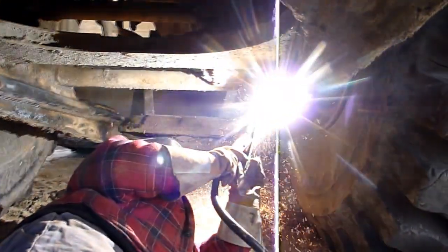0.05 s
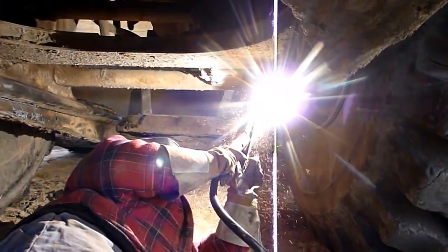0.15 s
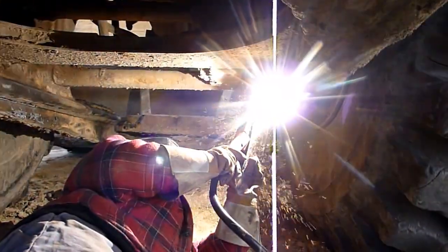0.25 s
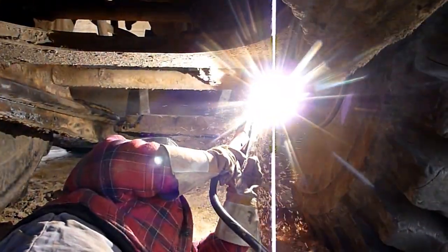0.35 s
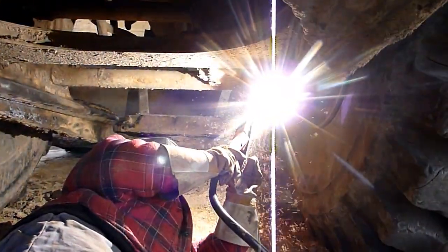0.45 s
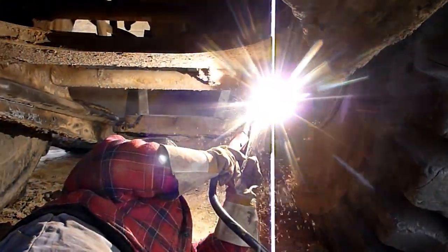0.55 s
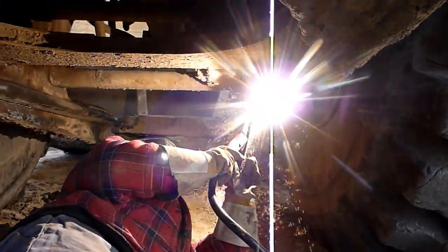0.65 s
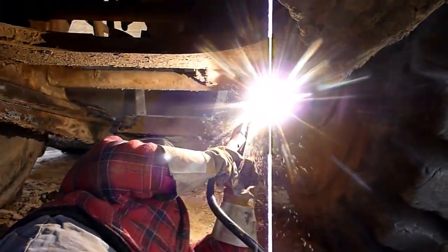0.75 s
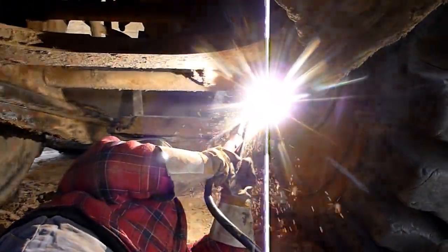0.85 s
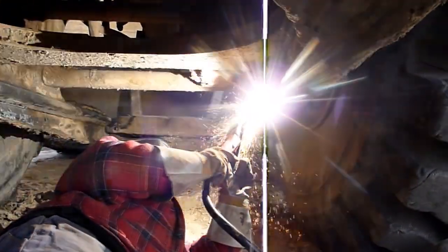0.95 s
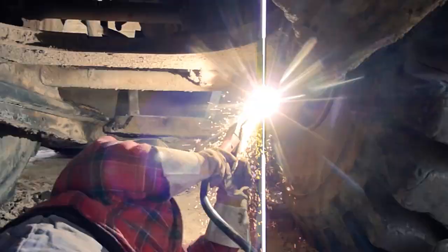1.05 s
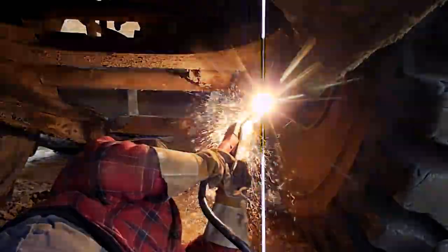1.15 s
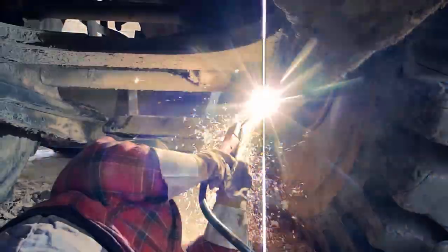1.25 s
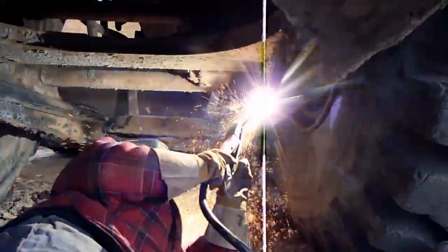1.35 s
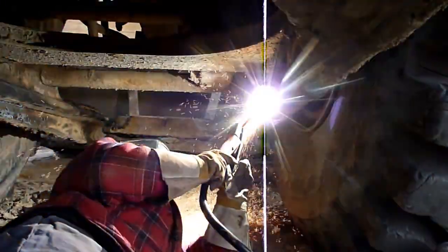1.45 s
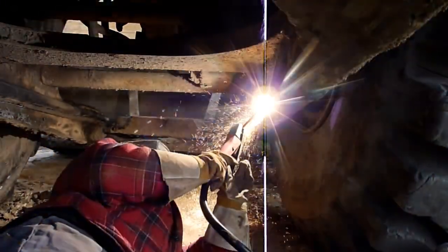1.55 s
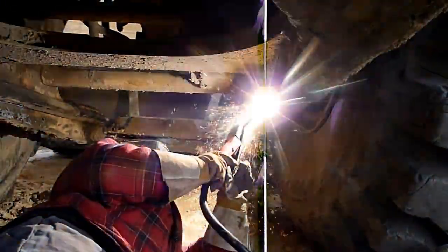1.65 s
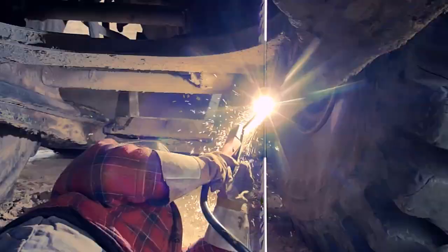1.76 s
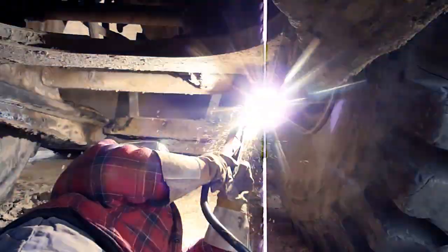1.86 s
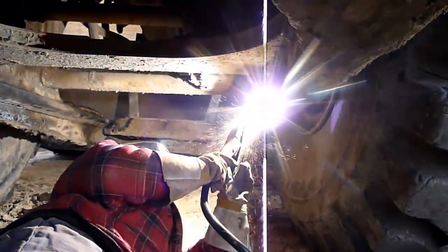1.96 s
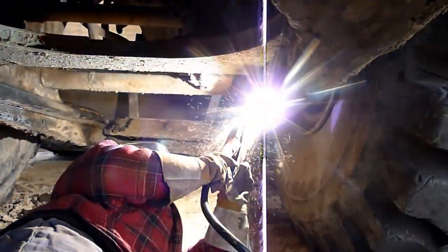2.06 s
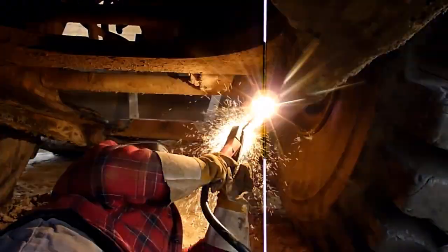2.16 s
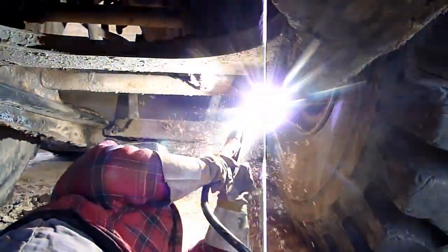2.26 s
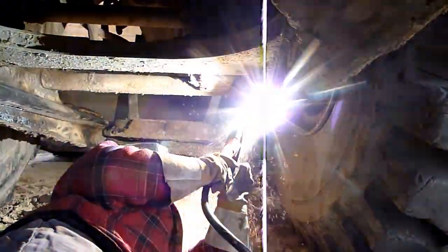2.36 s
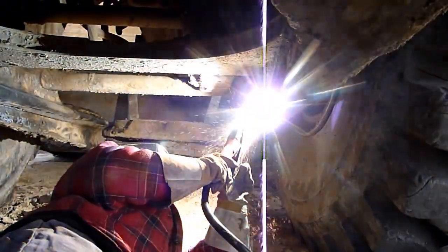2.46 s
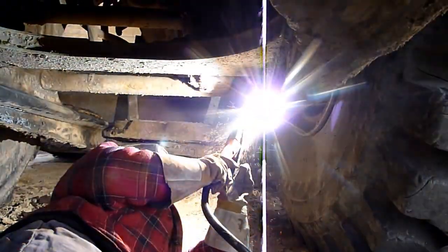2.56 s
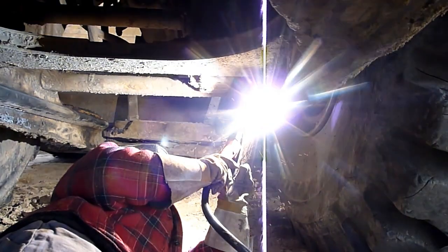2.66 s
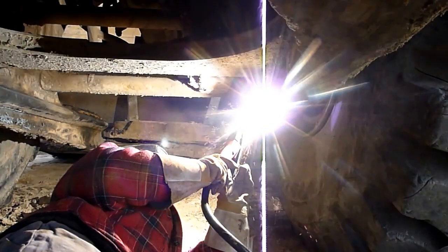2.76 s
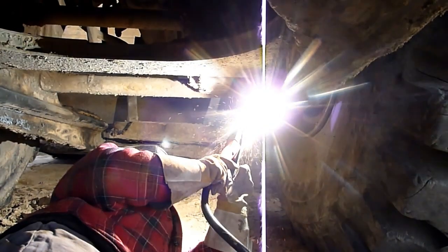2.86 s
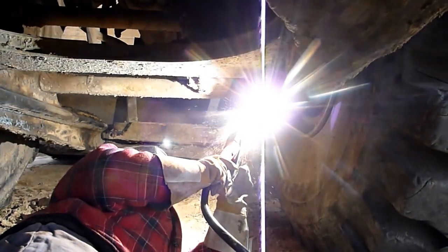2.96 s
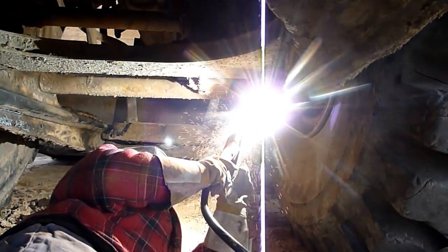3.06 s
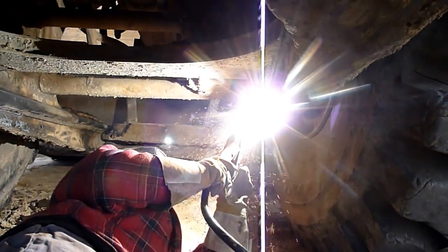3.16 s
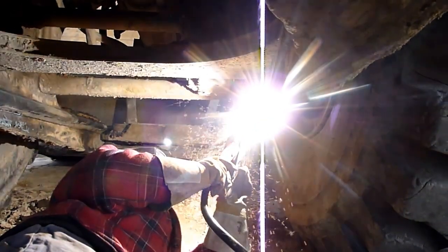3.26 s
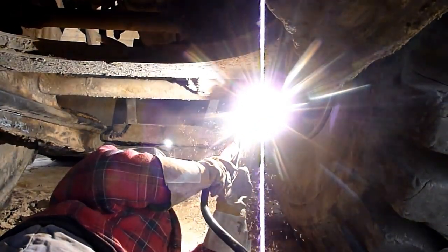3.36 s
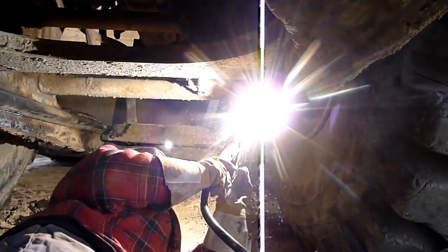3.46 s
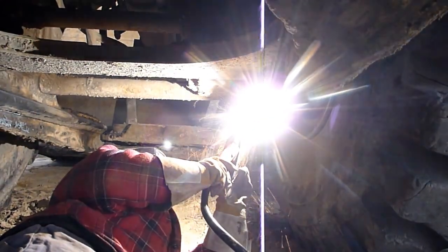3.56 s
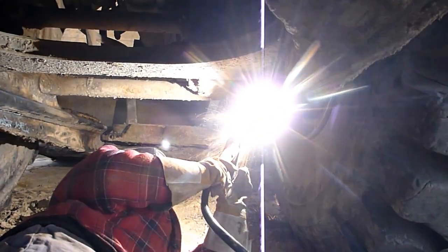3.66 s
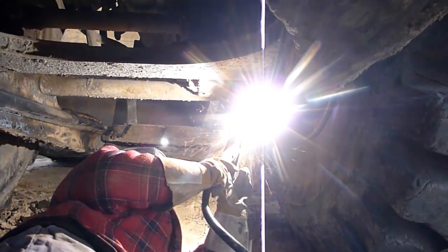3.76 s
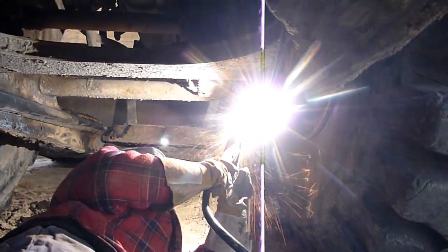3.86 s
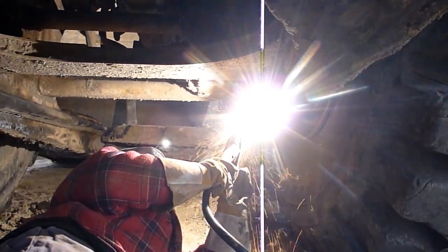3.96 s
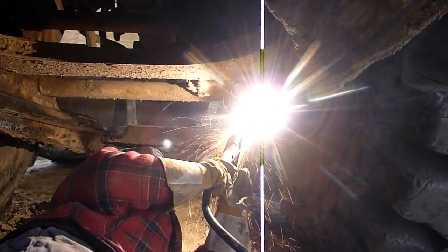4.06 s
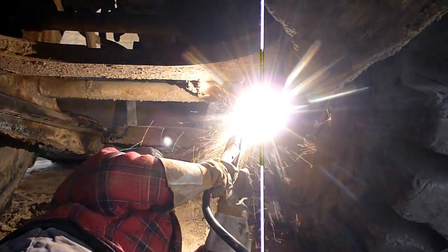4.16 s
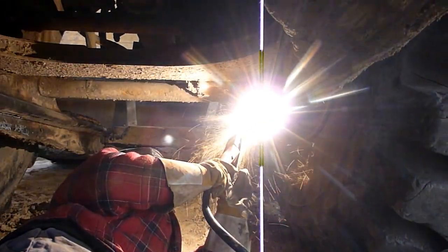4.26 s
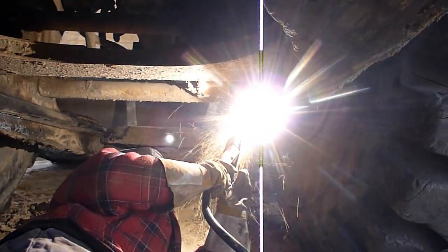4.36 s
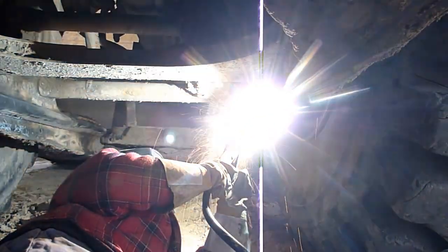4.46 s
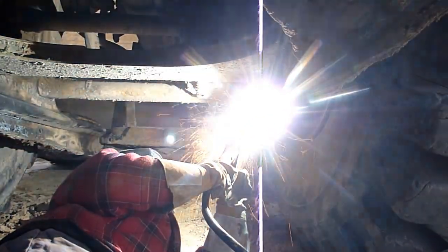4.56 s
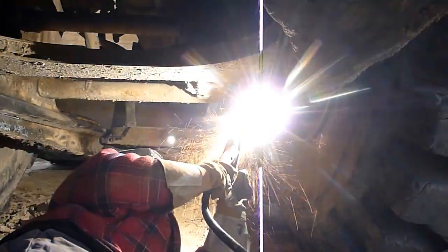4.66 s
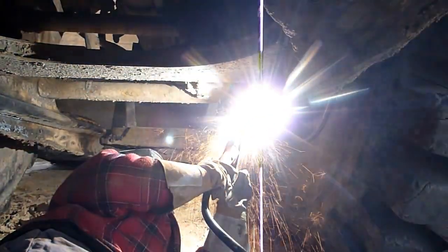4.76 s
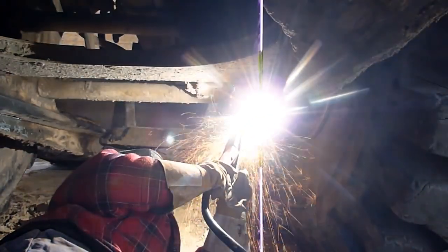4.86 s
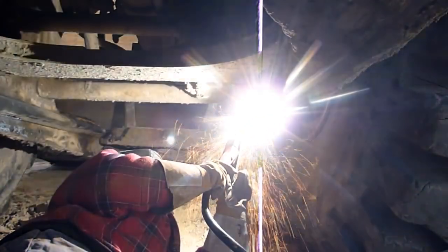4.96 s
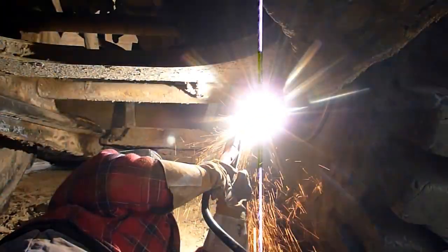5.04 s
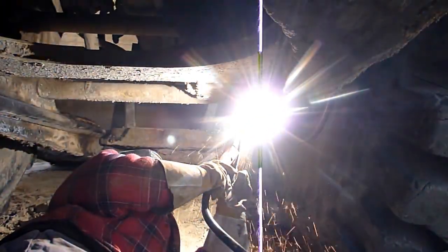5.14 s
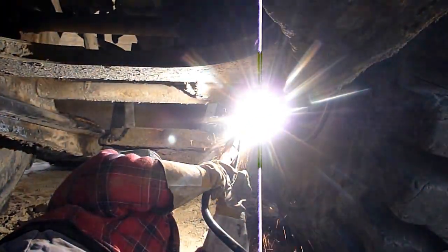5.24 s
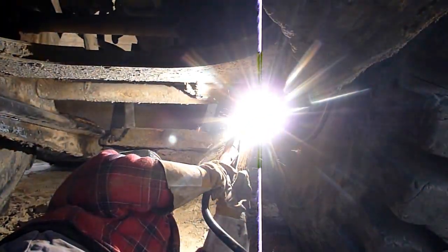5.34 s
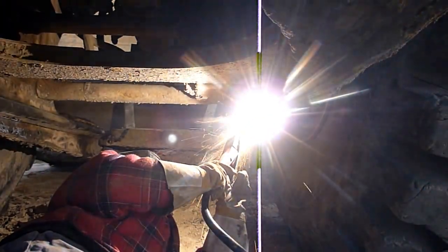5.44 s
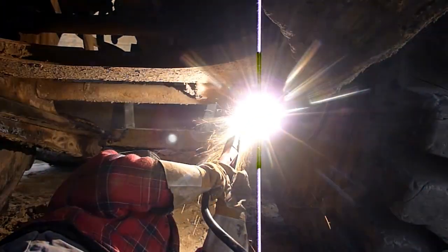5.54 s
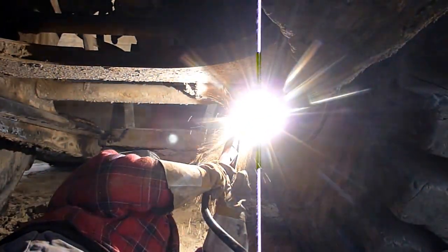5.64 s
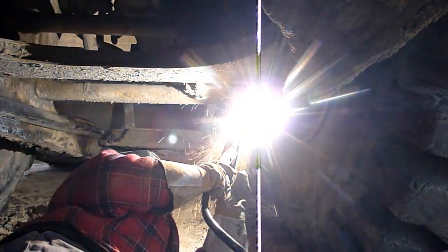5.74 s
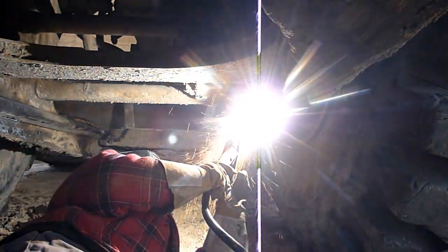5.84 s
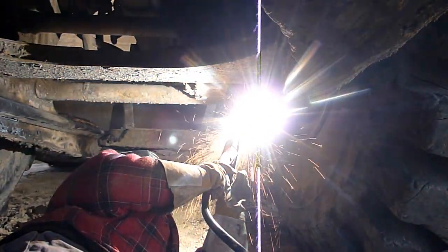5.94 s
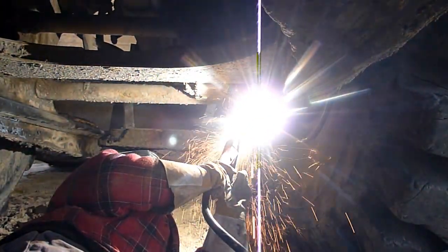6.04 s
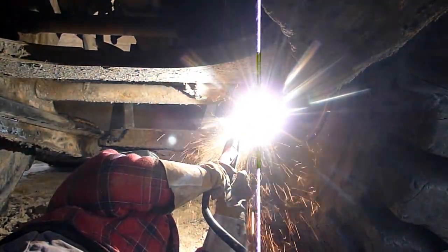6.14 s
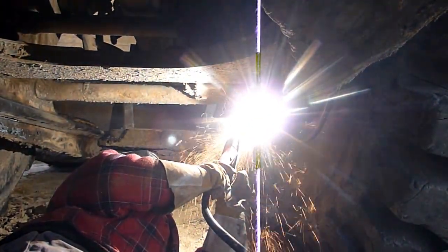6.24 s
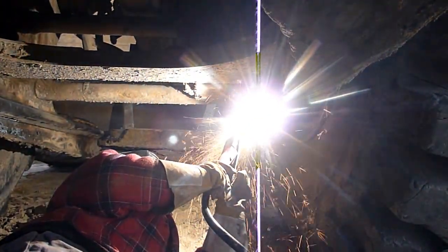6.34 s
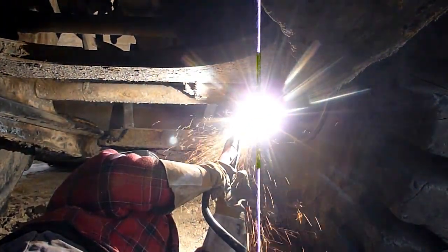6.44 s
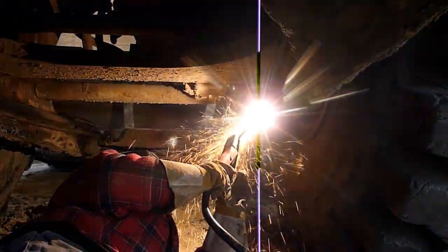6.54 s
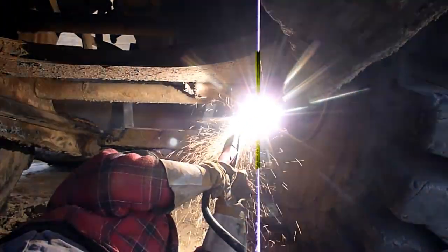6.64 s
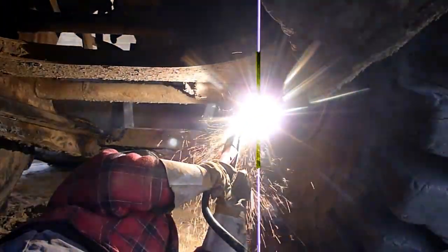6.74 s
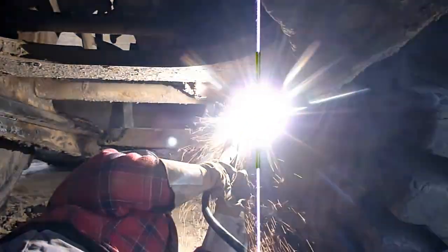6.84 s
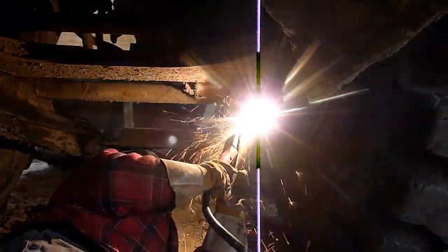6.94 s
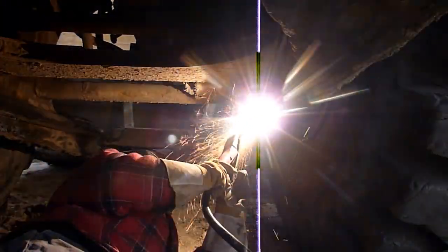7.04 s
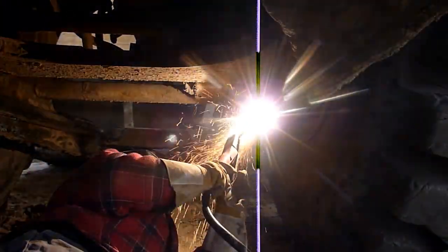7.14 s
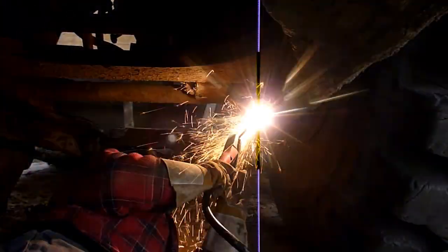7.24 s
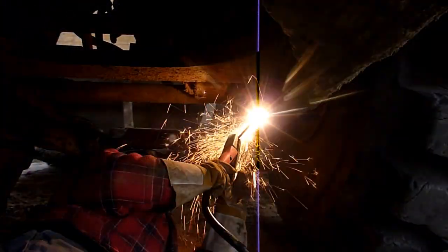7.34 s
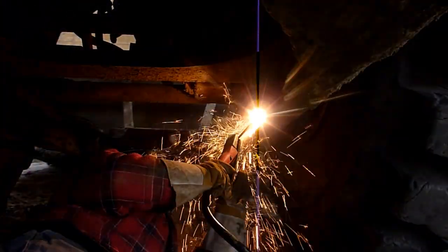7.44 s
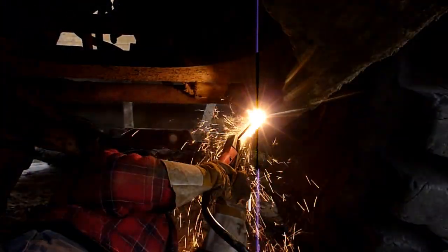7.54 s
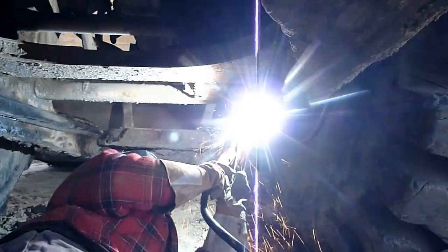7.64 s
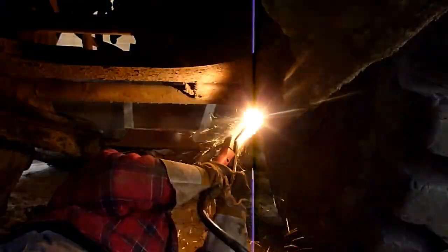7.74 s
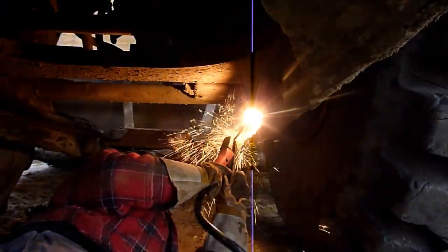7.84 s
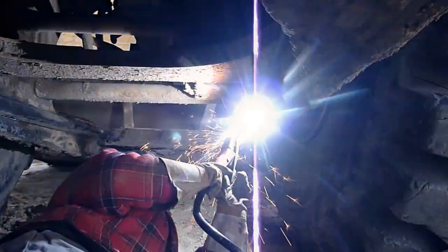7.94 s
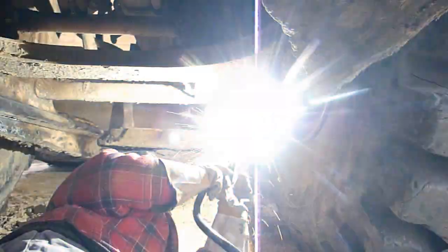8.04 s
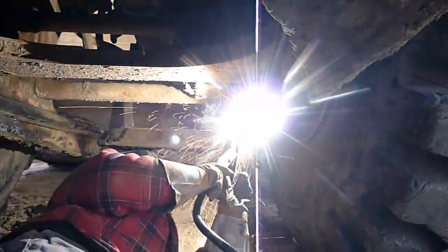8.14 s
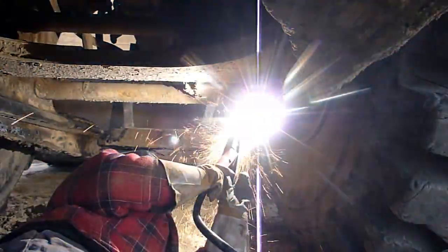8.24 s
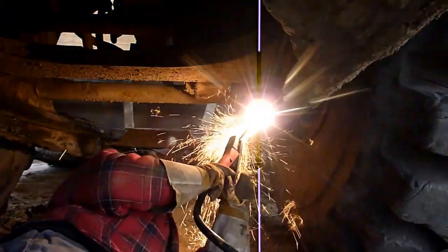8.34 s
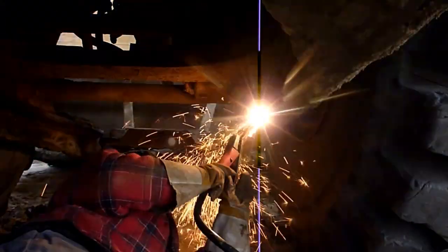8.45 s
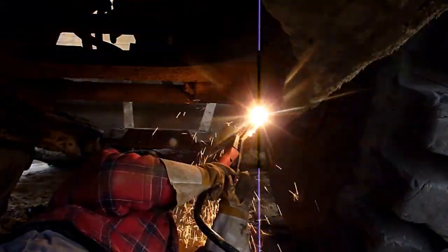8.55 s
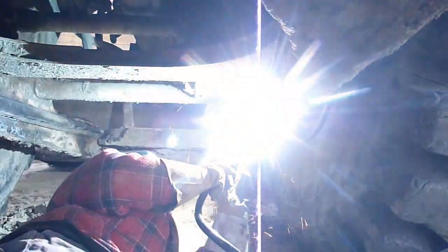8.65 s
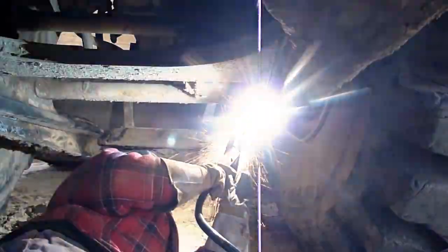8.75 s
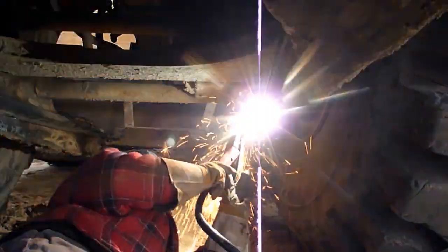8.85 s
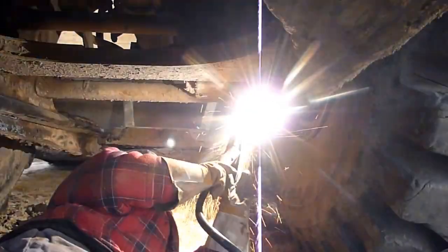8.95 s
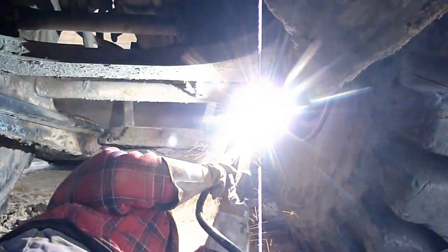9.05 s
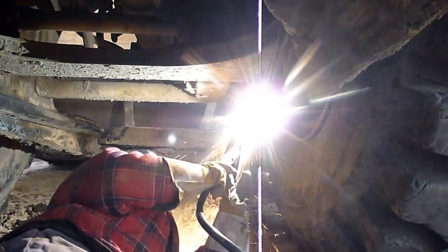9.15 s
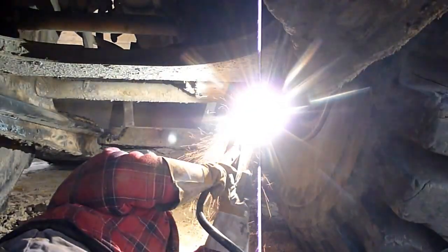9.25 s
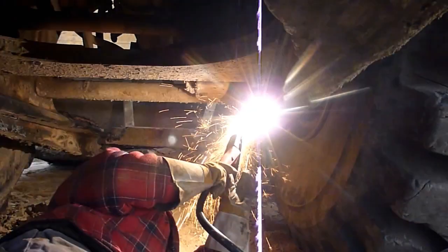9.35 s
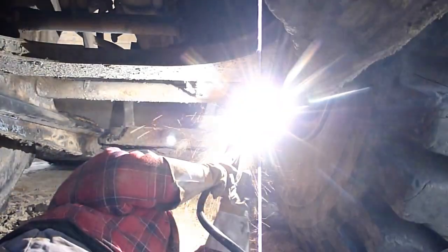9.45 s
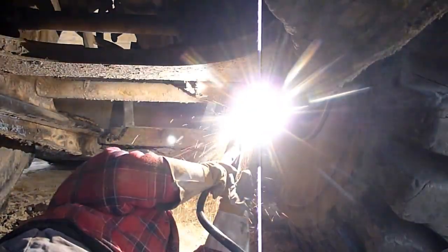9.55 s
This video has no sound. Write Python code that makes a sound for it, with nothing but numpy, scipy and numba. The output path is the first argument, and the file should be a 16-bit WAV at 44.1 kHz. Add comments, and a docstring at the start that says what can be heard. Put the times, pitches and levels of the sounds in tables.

```python
"""A carbon rod arcs against a steel frame: random noise and sparks roar, crackle, break off and strike again.
Melt bursts add dull pops, made of short dying swings.
An air jet blows the melt away: steady, fluttering noise that is left hissing when the arc is out.
Behind them a welding generator hums: a few sine tones that speed up when the arc unloads it."""
import sys
import numpy as np
from scipy import signal
from scipy.fft import rfft, irfft, next_fast_len
from scipy.io import wavfile
from scipy.ndimage import uniform_filter1d, map_coordinates
from numba import njit

SR = 44100
rng = np.random.default_rng(int(sys.argv[2]) if len(sys.argv) > 2 else 0)


def generate_wav(sig):
    """Save sig (samples, or channels by samples) to the path in sys.argv[1] as 16-bit PCM at SR."""
    pcm = np.round(np.clip(np.atleast_2d(sig).T, -1, 1) * 32767).astype(np.int16)
    wavfile.write(sys.argv[1], SR, pcm)


N = 423360

# strength of the burning arc, before flicker and breaks: (time [s], roar level [dB])
ARC_STRENGTH = [(0.0, -20), (0.15, -19.5), (0.38, -29.5), (0.47, -19), (0.54, -21.5), (0.6, -31.5),
                (0.86, -27.5), (0.98, -20), (1.22, -15.5), (1.4, -19), (1.48, -23.5), (1.55, -14.5),
                (1.85, -17.5), (2.2, -18), (2.4, -19), (2.9, -19), (3.25, -21), (3.48, -22.5), (3.62, -18),
                (3.76, -22.5), (3.88, -19), (4.06, -33.5), (4.4, -28.5), (4.475, -17.5), (4.56, -15),
                (4.66, -19), (5.12, -20), (5.38, -22), (5.5, -34.5), (5.62, -28), (5.75, -18.5),
                (5.9, -17.5), (6.05, -26.5), (6.12, -21), (6.6, -16.5), (6.8, -17.5), (6.87, -28.5),
                (7.1, -38.5), (7.4, -50.5), (7.55, -38), (7.65, -22.5), (7.69, -15), (7.98, -18),
                (8.07, -25.5), (8.14, -22.5), (8.21, -25), (8.235, -16.5), (8.62, -18), (8.9, -13.5),
                (9.12, -23.5), (9.23, -23), (9.38, -16), (9.6, -22)]
# the arc goes out and strikes again: (out [s], struck again [s], flare at the strike [dB])
ARC_BREAKS = [(1.008, 1.032, 3), (1.06, 1.075, -2.5), (1.118, 1.199, 0), (1.25, 1.278, 0),
              (1.569, 1.632, 9.5), (1.669, 1.701, 6.5), (1.749, 1.77, 4), (2.126, 2.209, 10.5),
              (2.27, 2.289, 7.5), (2.727, 2.738, 7.5), (3.105, 3.119, 3.5), (4.515, 4.532, 2),
              (4.797, 4.83, 3), (4.888, 4.935, 12), (6.527, 6.577, 0.5), (6.636, 6.67, 0.5),
              (6.723, 6.785, 0), (6.89, 6.98, -13), (7.696, 7.959, 1.5), (8.251, 8.264, 5),
              (8.282, 8.598, -1.5), (8.706, 8.723, 4), (8.772, 8.848, -10), (8.923, 8.956, -3.5),
              (9.33, 9.352, 1)]
# brief spits of the arc: (time [s], level against the burning arc [dB], half-length [ms])
ARC_SPITS = [(1.101, -1, 2.5), (1.218, 5, 1.5), (1.227, -4, 1.6), (1.296, -3, 4.1), (6.565, -5, 2.5),
             (6.668, -2, 2), (7.998, -4, 8.6), (8.225, -5.5, 3.9), (8.238, -4.5, 5.5), (8.28, -1.5, 3.6)]
# balance at reference strength: (time [s], rumble level [dB], fizz level [dB],
# roar over 3.5 kHz against the roar [dB], roar under 2.2 kHz against the band just over it [dB])
ARC_TONE = [(0, -36, -38, -10, 0), (.5, -46.5, -36.5, -10.5, -3), (1.1, -34.5, -36, -13, 3),
            (1.5, -51, -42, -13, -1.5), (2, -49, -43.5, -14.5, 1.5), (2.5, -46, -46.5, -14, 0.5),
            (3, -41, -42, -14, -1.5), (3.7, -39.5, -43.5, -14, 1.5), (4.4, -47, -38.5, -13, -2.5),
            (5.1, -36.5, -44.5, -16, 0), (5.8, -43, -39.5, -12.5, -3.5), (6.5, -42, -41, -13.5, -1),
            (7.198, -43, -42, -11.5, -3), (7.9, -41, -38, -14, 0), (8.15, -43, -39, -13, -0.5),
            (8.6, -44, -35, -9, -2), (9.1, -46.5, -41, -12, -3.5), (9.6, -44, -42, -14, -5.5)]
# spectrum shapes, only relative levels count: (frequency [Hz], level [dB])
ROAR_SHAPE = [(200, -38), (450, -19.5), (700, -10.5), (1000, -8), (1550, -2.5), (2200, -4.5), (2700, 1),
              (3400, -9.5), (4400, -12), (6000, -21), (7500, -37), (9000, -55)]
RUMBLE_SHAPE = [(40, -61), (90, -15), (150, -4), (300, 1), (500, -1), (900, -10.5), (2000, -70)]
FIZZ_SHAPE = [(4000, -3.5), (6500, -0.5), (8500, -4.5), (10000, -1.5), (12000, -3), (13500, -9),
              (15000, -45)]
JET_SHAPE = [(25, -40), (60, -22), (190, -10.5), (300, -17.5), (550, -14), (1140, -4.5), (2820, -2),
             (4000, -11.5), (5000, -12.5), (6300, -19), (9600, -16), (12500, -20), (15000, -37)]
# melt bursts with a dull pop: (time [s], level [dB], pitch [Hz])
MELT_POPS = [(1.044, -17, 224), (1.1006, -16, 240), (1.298, -22, 422), (3.796, -27, 201), (6.61, -25, 387),
             (7.991, -26, 221), (8.279, -22, 260)]
# resonances of the hollow under the frame, each layer takes a share: (centre [Hz], width [Hz], lift [dB])
HOLLOW_PEAKS = [(398, 58, 6), (520, 45, 5), (676, 75, 9), (815, 60, 6), (975, 80, 6), (1100, 50, 4),
                (1185, 70, 5), (1352, 60, 6), (1515, 100, 9), (1655, 110, 10.5), (1760, 60, 7),
                (1890, 70, 7), (2017, 40, 4), (2135, 180, 8), (2315, 45, 3), (2430, 130, 6), (2560, 80, 3),
                (2662, 130, 7), (2780, 60, 3), (2875, 120, 8), (3095, 70, 5), (3230, 100, 4), (3402, 70, 4),
                (3700, 200, 3), (3930, 130, 5), (4156, 100, 2), (4740, 270, 8.5), (5373, 250, 6),
                (5717, 120, 5), (6020, 150, 3)]
# small treble resonances, shared likewise: (centre [Hz], width [Hz], lift [dB])
TREBLE_PEAKS = [(6130, 90, 3.5), (6580, 220, 4.5), (9150, 220, 8), (9400, 390, 0), (10200, 200, -2),
                (11300, 330, 8), (14400, 250, 2)]
# narrow dips where reflections cancel, shared likewise: (centre [Hz], width [Hz], lift [dB])
REFLECTION_DIPS = [(345, 45, -7), (455, 35, -9), (528, 22, -7), (745, 30, -4), (1140, 30, -4),
                   (1812, 30, -4), (2045, 25, -5), (2265, 45, -4), (2352, 35, -6), (2730, 45, -4),
                   (3990, 50, -4), (4260, 120, -3), (4900, 90, -3)]
# generator tones as multiples of its speed: (multiple [times])
SHAFT_ORDERS = [1, 1.5, 2]
# levels of these tones before labour and wobble: (level [dB])
SHAFT_LEVELS = [-60, -67.5, -60.5]

REFERENCE_DB = -18  # roar level at which ARC_TONE holds as written
# how far each tone value moves, in dB per dB of arc strength
RUMBLE_GROWS, FIZZ_GROWS, SPRAY_GROWS, TILT_GROWS = 1.64, 0.31, -0.37, 0.2
FADE_MS, RISE_MS, FLARE_S = 6.25, 4.2, 0.018  # dying out, striking (times a layer's slowness), flare
LOADED_HZ, FREE_RISE_HZ = 58, 6.2  # base speed in turns per second; rise when free, before the governor
INERTIA_S, GOVERNOR_S, GOVERNOR_SHARE = 0.12, 0.54, 0.403  # the governor pulls the speed back
LABOUR_DB_PER_HZ = 4  # the hum swells below the base speed
FAINT_DB = -42  # an arc this weak no longer loads the generator
TOP_HZ = 15050  # nothing is heard from here up


def arc():
    """The plasma column flickers: one unsteady gain drives roar, rumble and fizz."""
    roar_db, = curves(ARC_STRENGTH)
    # a weak arc has a much fainter rumble, but a brighter roar
    grows = [RUMBLE_GROWS, FIZZ_GROWS, SPRAY_GROWS, TILT_GROWS]
    stronger_db = roar_db - REFERENCE_DB
    tone = [db + g * stronger_db for db, g in zip(curves(ARC_TONE), grows)]
    rumble_db, fizz_db, spray_db, tilt_db = tone
    flicker_db = 1.1 * wobble(14) + 0.48 * wobble(60) + 0.9 * wobble(250)
    spit_gain = spits()
    sparks = crackle(rate=900, spread_db=3.0)

    def layer(db, spiky, slowness, shape, share):
        """Noise and sparks under the arc's gain, through a spectrum and the hollow."""
        colour = lambda hz: along(shape, hz) + hollow(hz, share)
        source = unit(rng.standard_normal(N) + spiky * sparks)
        gain = (burning(slowness) + spit_gain) * amp(db)
        return coloured(echoed(source, gain), colour) / np.std(coloured(source, colour))

    # at a strike the fizz comes first and the rumble builds last: see slowness
    roar = layer(roar_db + flicker_db, spiky=0.71, slowness=0.96, shape=ROAR_SHAPE, share=1.015)
    roar = voiced(roar, roar_db, spray_db, tilt_db)
    rumble_db = rumble_db + 1.1 * flicker_db + 1.9 * wobble(20)
    rumble = layer(rumble_db, spiky=0.36, slowness=1.1, shape=RUMBLE_SHAPE, share=0.67)
    fizz = layer(fizz_db + flicker_db, spiky=0.088, slowness=0.44, shape=FIZZ_SHAPE, share=0.44)
    return roar + rumble + fizz


def voiced(roar, roar_db, spray_db, tilt_db):
    """The roar's balance follows the arc: a weak arc sounds thin, a strong one full."""
    upper, spray = above(roar, 2230), above(roar, 3500)
    body = roar - above(roar, 1100)
    roar = roar + body * (amp(0.056 * (roar_db + 14.0)) - 1)
    lower, middle = roar - upper, upper - spray
    balanced = 0.65 * (unit(lower) * amp(tilt_db / 2) + unit(middle) * amp(-tilt_db / 2))
    return np.std(roar) * (balanced + unit(spray) * amp(spray_db))


def burning(slowness):
    """About 1 while the arc burns; it fades out, strikes within a few ms and flares."""
    t, lit = np.arange(N) / SR, np.ones(N)
    for out, struck, flare_db in ARC_BREAKS:
        fade = slice(round((out - 0.01) * SR), round(struck * SR))  # starts 10 ms early
        strike = slice(fade.stop, round((struck + 0.2) * SR))
        lit[fade] *= np.exp(-(t[fade] - t[fade.start]) * 1000 / FADE_MS)
        since = t[strike] - t[strike.start]
        rise = 1 - np.exp(-since * 1000 / (slowness * RISE_MS + 0.5))
        lit[strike] *= rise * amp(flare_db * np.exp(-since / FLARE_S))
    return lit


def spits():
    """Extra gain for the brief spits, each a smooth bump."""
    t = np.arange(N) / SR
    return sum(amp(db) * np.exp(-((t - s) * 1000 / ms) ** 2) for s, db, ms in ARC_SPITS)


def crackle(rate, spread_db):
    """Sparks at random moments and of uneven size, rate per second on average."""
    sparks = rng.random(N) < rate / SR
    size = amp(spread_db * np.clip(rng.standard_normal(N), -3, 2))
    return unit(sparks * rng.choice([-1, 1], N) * size)


def echoed(source, gain):
    """Source under gain, plus diffuse echo of steel and rock nearby: noise that trails the energy."""
    t = np.arange(SR // 3) / SR
    tail = amp(-60 * t / 0.13) ** 2  # the echo falls 60 dB in 0.13 s
    wet = np.sqrt(abs(signal.fftconvolve(gain ** 2, tail / tail.sum())[:N]))
    return source * gain + amp(-9) * wet * rng.standard_normal(N)


def pops():
    """Each pop is a low swing with a snap on top, soon dying; a wall returns it once."""
    out, t = np.zeros(N + SR), np.arange(SR // 20) / SR
    for s, db, hz in MELT_POPS:
        snap = 0.82 * amp(-60 * t / 0.047) * np.sin(2 * np.pi * 2.26 * hz * t)
        swing = np.sin(2 * np.pi * hz * t) + snap
        onset = 1 - np.exp(-t / 0.00072)
        out[round(s * SR):][:len(t)] += amp(db - 60 * t / 0.026) * swing * onset
    returned = np.pad(out, (round(0.0112 * SR), 0))[:N]
    return out[:N] + amp(-18) * returned


def jet():
    """Compressed air rushes from the holder's nozzles as noise with a slight flutter."""
    air = rng.standard_normal(N) * amp(0.22 * wobble(2.5) + 1.67 * wobble(35))

    def colour(hz):
        """The jet's spectrum; its treble escapes the hollow."""
        return along(JET_SHAPE, hz) + hollow(hz, share=0.41) / (1 + (hz / 3800) ** 4)

    return amp(-34.0) * unit(coloured(air, colour))


def hollow(hz, share):
    """Lift or dip in dB around each resonance and cancelling reflection."""
    bands = HOLLOW_PEAKS + TREBLE_PEAKS + REFLECTION_DIPS
    # each width spans the points at half the dB
    return share * sum(db * np.exp(-np.log(16) * ((hz - c) / w) ** 2) for c, w, db in bands)


def shifting(x, depth_db):
    """Narrow bands swell and fade slowly as rod and listener move among the reflections."""
    hz, _, z = signal.stft(x, SR, nperseg=1024)
    field = uniform_filter1d(rng.standard_normal(z.shape), size=3, axis=0)
    field = uniform_filter1d(field, size=40, axis=1)
    field = uniform_filter1d(field, size=12, axis=1)
    reach = np.clip(hz / 4000, 0.3, 1)[:, None]  # short waves feel small moves most
    return signal.istft(z * amp(depth_db * reach * unit(field)), SR, nperseg=1024)[1][:N]


def generator():
    """A shaft hums at multiples of its speed; it runs up when the arc is out or faint, and sags under load."""
    load = burning(slowness=0.92) * (curves(ARC_STRENGTH)[0] - FAINT_DB) / 10
    free = 1 - np.clip(load, 0, 1)
    governed = free - GOVERNOR_SHARE * lagged(free, GOVERNOR_S)
    rise_hz = FREE_RISE_HZ * lagged(governed, INERTIA_S)
    labour_db = LABOUR_DB_PER_HZ * np.clip(-rise_hz, 0, None)
    turn = 2 * np.pi * np.cumsum(LOADED_HZ + rise_hz + 0.19 * wobble(6.2)) / SR
    hum = np.zeros(N)
    for order, db in zip(SHAFT_ORDERS, SHAFT_LEVELS):
        hum += amp(db + labour_db + 2.1 * wobble(4.9)) * np.sin(order * turn)
    return np.sqrt(2) * hum


def lagged(x, seconds):
    """x followed with inertia."""
    keep = np.exp(-1 / (seconds * SR))
    return signal.lfilter([1 - keep], [1, -keep], x)


def amp(db):
    """Turn dB into gain."""
    return 10 ** (np.asarray(db) / 20)


def unit(x):
    """x scaled to an average (rms) strength of 1."""
    return x / np.sqrt(np.mean(x ** 2) + 1e-20)


def along(points, hz):
    """Read a curve of (frequency, value) points on a log frequency axis."""
    f, v = np.transpose(points)
    return np.interp(np.log(hz + 1), np.log(f + 1), v)


def curves(rows):
    """One value per sample for each column after the time."""
    s, *columns = np.transpose(rows)
    return [np.interp(np.arange(N) / SR, s, c) for c in columns]


def wobble(rate):
    """A smooth random curve through rate random points a second."""
    points = rng.standard_normal(int(N * rate / SR) + 4)
    return map_coordinates(points, [np.arange(N) * rate / SR])


def coloured(x, db_at, size=8192):
    """x through the filter whose gain in dB is db_at(Hz), with no sound ahead of its cause."""
    cepstrum = irfft(np.log(amp(db_at(np.fft.rfftfreq(size, 1 / SR))) + 1e-6))
    # folding the cepstrum forward makes the filter respond as early as it can
    cepstrum[1:size // 2] *= 2
    cepstrum[size // 2 + 1:] = 0
    return signal.fftconvolve(x, irfft(np.exp(rfft(cepstrum))))[:N]


def above(x, hz):
    """The part of x over hz, with a soft edge."""
    f = np.fft.rfftfreq(N, 1 / SR)
    return irfft(rfft(x) / (1 + np.exp(np.clip((hz - f) / 60, -50, 50))), N)


def scene():
    """Arc and jet among shifting reflections, pops and hum beside them."""
    return (shifting(arc() + jet(), depth_db=2.5) + pops() + generator())[None]


@njit
def follow(level, fall):
    """Rises at once with the level, sinks no faster than by the factor fall per sample."""
    out = level.copy()
    for i in range(1, len(out)):
        out[i] = max(out[i], out[i - 1] * fall)
    return out


def port_db(hz):
    """A port cancels a narrow band near 8 kHz; gain in dB."""
    off = (hz - 7910) ** 2
    return 10 * np.log10((off + 60 ** 2) / (off + 900 ** 2))


def record(dry):
    """Gain control that recovers slowly, a port's dip, a bass cut, soft overload and a treble limit."""
    level = np.sqrt(abs(uniform_filter1d(dry[0] ** 2, size=441)))  # over 10 ms
    held = follow(level + amp(-20.0), amp(-18 / SR))  # sinks at most 18 dB a second
    x = dry[0] * (held / amp(-14.0)) ** -0.25
    x = coloured(x, port_db)
    x = signal.sosfilt(signal.butter(2, 45, "highpass", fs=SR, output="sos"), x)
    x = x / (1 + abs(x / 0.97) ** 6) ** (1 / 6)  # peaks bend towards 0.97
    m = next_fast_len(N + SR // 2)
    return irfft(rfft(x, m) * (np.fft.rfftfreq(m, 1 / SR) < TOP_HZ), m)[None, :N]


dry = scene()
out = record(dry)
generate_wav(out)
```